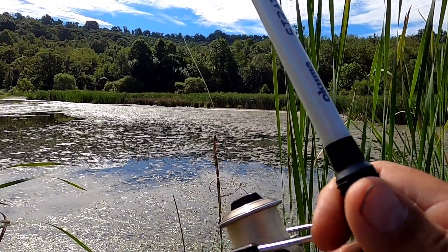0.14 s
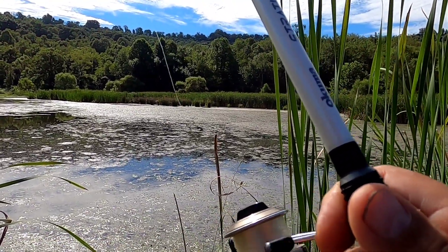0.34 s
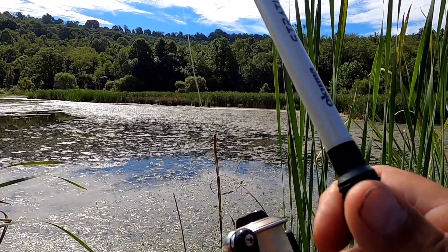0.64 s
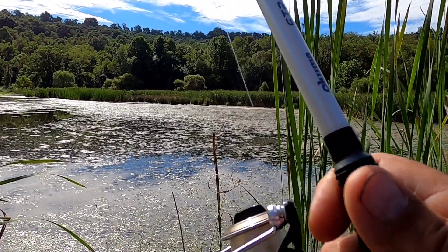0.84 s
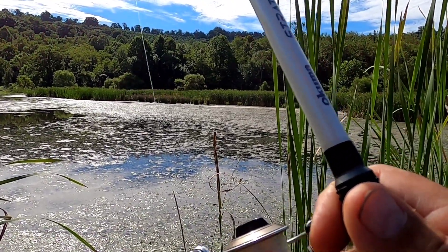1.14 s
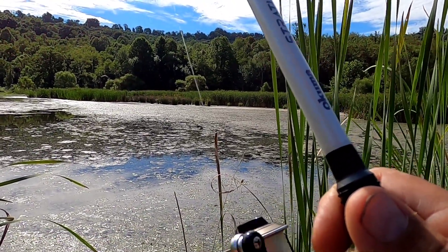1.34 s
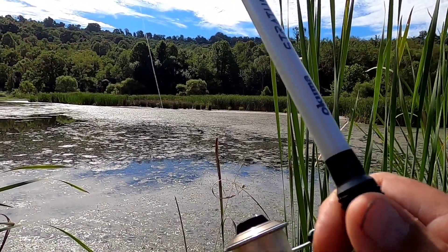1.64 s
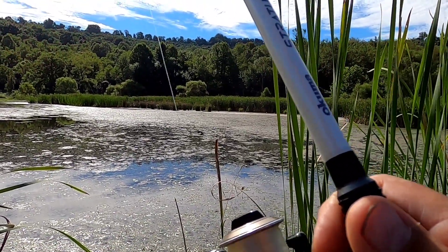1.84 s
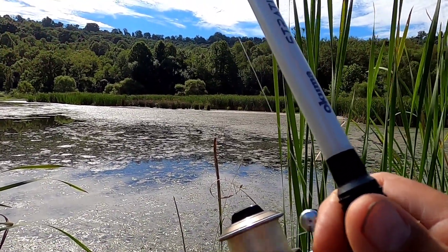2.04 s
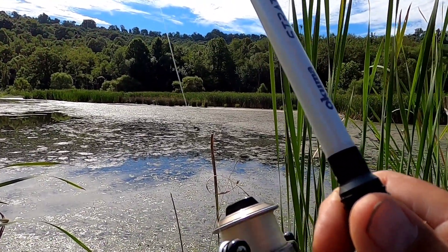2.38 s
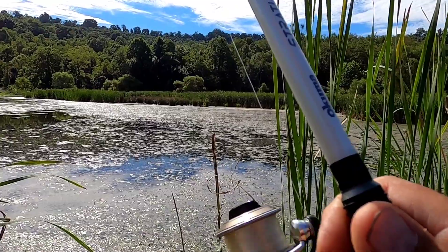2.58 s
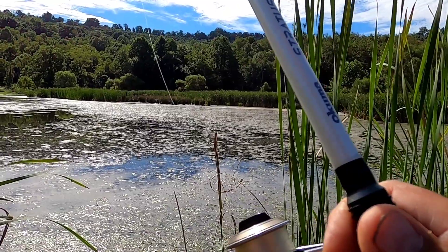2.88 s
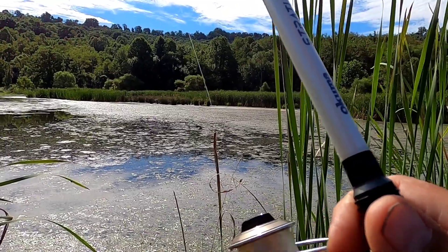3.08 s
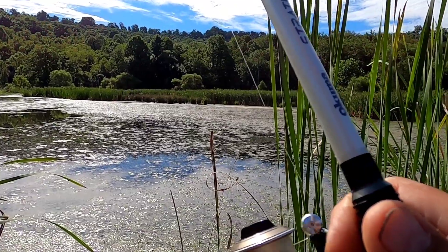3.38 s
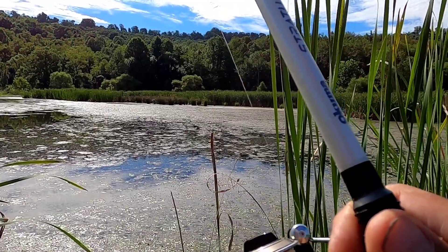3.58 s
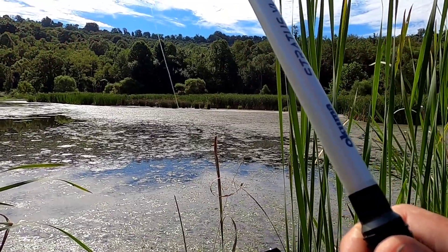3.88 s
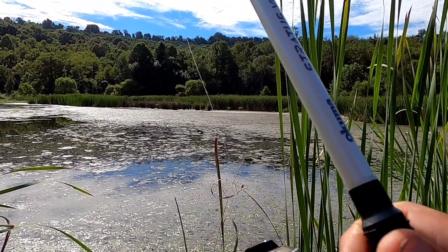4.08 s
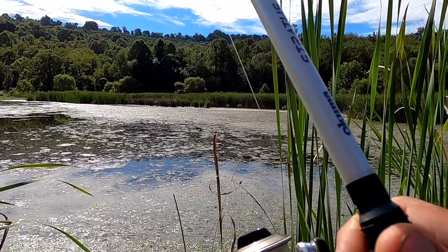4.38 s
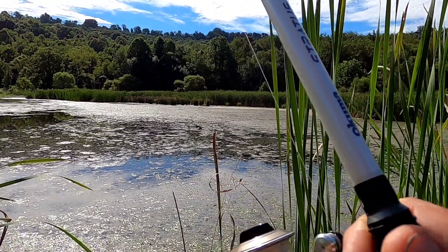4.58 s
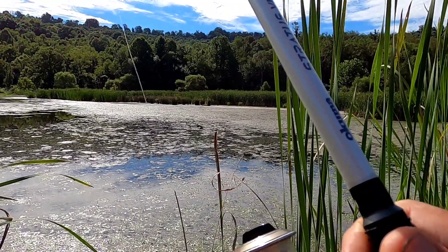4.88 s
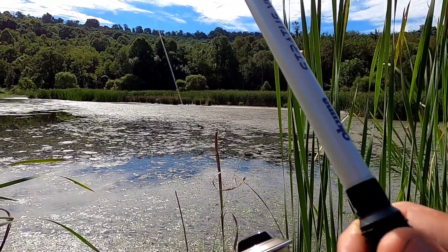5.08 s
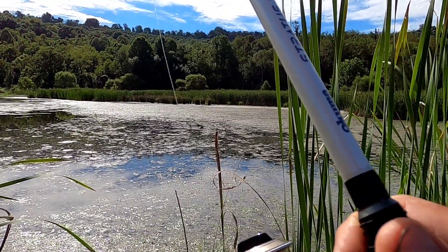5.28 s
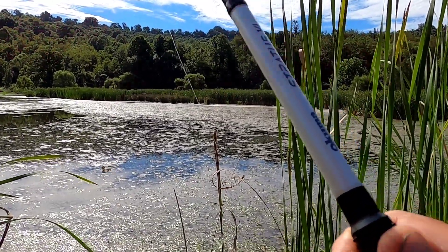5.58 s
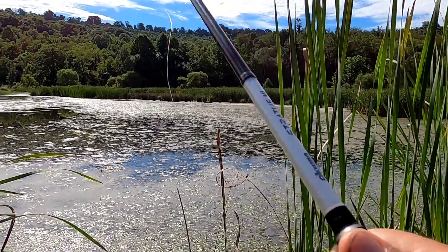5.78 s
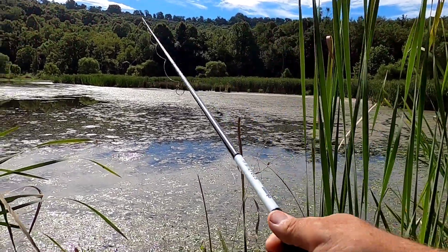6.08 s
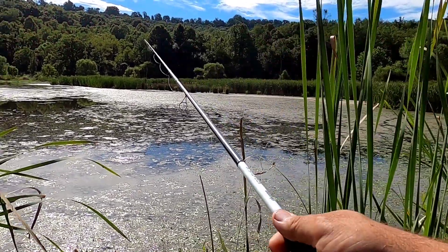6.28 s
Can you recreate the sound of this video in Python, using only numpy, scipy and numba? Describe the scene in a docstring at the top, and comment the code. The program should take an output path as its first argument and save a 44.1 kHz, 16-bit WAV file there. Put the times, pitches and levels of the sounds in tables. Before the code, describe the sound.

Close winding of a spinning reel, ringing and scraping with wet line hiss and small ticks, beside a pond of trilling insects and low rumble.

```python
"""An angler winds a spinning reel at a weedy pond, close to a microphone with two ports.
From the start the reel rasps in uneven strokes (slips ringing damped modes), and wet line hisses (coloured noise).
Crickets trill (gliding tone pulses) over an insect chorus; an engine drones under a breeze that gusts early on.
Ticks and brief squeaks dot the winding; near its end the grip creaks, loose parts rattle and the rod knocks.
Once the reel is still, a thin gliding tone swells briefly."""
import sys
import numpy as np
from scipy import signal
from scipy.fft import rfft, irfft, next_fast_len
from scipy.io import wavfile
from scipy.ndimage import uniform_filter1d
from numba import njit

SR = 44100
rng = np.random.default_rng(int(sys.argv[2]) if len(sys.argv) > 2 else 0)


def unload_wav(signal):
    """Save mono or channel-first audio to the path in sys.argv[1] as 16-bit WAV at rate SR, clipped to [-1, 1]."""
    wavfile.write(
        sys.argv[1],
        SR,
        np.round(np.clip(np.atleast_2d(signal).T, -1, 1) * 32767).astype(np.int16),
    )


N = 283563
T = np.arange(N) / SR
FREQS = np.fft.rfftfreq(N, 1 / SR)


def undb(db):
    """Logarithmic level: decibels to amplitude gain."""
    return 10 ** (np.asarray(db) / 20)


def unit(x):
    """Normalisation: scale to rms 1."""
    return x / np.sqrt(np.mean(x ** 2))


def across(points):
    """Spectral interpolation: a table over frequency, joined on a log axis."""
    hz, value = np.transpose(points)
    return np.interp(np.log(FREQS + 1), np.log(hz), value)


def pan(db):
    """Interaural level difference: left and right gains, left louder when positive."""
    return undb(np.array([[db], [-db]]) / 2)


def walk(rate_hz):
    """Low-passed randomness: a random wavering of rms 1, at up to about the given rate."""
    size = next_fast_len(N, real=True)
    hz = np.fft.rfftfreq(size, 1 / SR)
    spectrum = rfft(rng.standard_normal(size)) / (1 + (hz / rate_hz) ** 4)
    return unit(irfft(spectrum, size)[:N])


def swell(start, length, attack_s, release_s):
    """Smooth gating: attack, hold and release, from 0 to 1 and back."""
    rise = 1 + np.tanh(2 * (T - start) / attack_s)
    fall = 1 - np.tanh(2 * (T - start - length) / release_s)
    return (rise / 2) * (fall / 2)


def stereo_noise(gain, likeness, grain=1):
    """Partial coherence: mid and side noise, weighted to set the ports' correlation; grain shapes it first."""
    c = np.clip(across(likeness), -1, 1)
    source = rfft(rng.standard_normal((2, N)) * grain)
    mid, side = source * gain * np.sqrt([1 + c, 1 - c])
    return unit(irfft(np.array([mid + side, mid - side]), N))


def resonance(hz, width_hz):
    """Damped oscillator: frequency response of one mode."""
    return 1j * FREQS * width_hz / (hz ** 2 - FREQS ** 2 + 1j * FREQS * width_hz)


@njit
def svf(x, hz, width):
    """Time-varying resonance: a state-variable band-pass whose centre moves."""
    y, band, low = np.empty(len(x)), 0., 0.
    for i in range(len(x)):
        g, k = np.tan(np.pi * hz[i] / SR), width / hz[i]
        v = (band + g * (x[i] - low)) / (1 + g * (g + k))
        band, low, y[i] = 2 * v - band, low + 2 * g * v, k * v
    return y


# small frictional catches, each with a random strength
CATCHES_PER_S, CATCH_SPREAD_DB, CATCH_DECAY_S = 750, 3.5, .0009


def catches():
    """Stick-slip friction: an envelope of irregular catches, each starting sharply and decaying fast."""
    strength = undb(CATCH_SPREAD_DB * np.clip(rng.standard_normal(N), -2, 2))
    size = (rng.random(N) < CATCHES_PER_S / SR) * strength
    return unit(signal.lfilter([1], [1, -np.exp(-1 / (CATCH_DECAY_S * SR))], size))


CRACK_T60_S, CONTACT_RISE_S = .015, .00025


def contacts(hits, partials):
    """Modal impact: each hit (s, ring Hz, ring dB, t60 s, crack dB) cracks and rings a few damped modes."""
    t = T[:SR // 8]
    attack = 1 - np.exp(-t / CONTACT_RISE_S)
    lag = np.array([[2 / SR], [0]])  # sound reaches the left port a moment later
    rings, cracks = np.zeros((2, 2, N))
    for s, hz, ring_db, t60, crack_db in hits:
        at = slice(int(s * SR), int(s * SR) + len(t))
        modes = sum(undb(db) * np.sin(2 * np.pi * k * hz * (t - lag)) for k, db in partials)
        rings[:, at] += undb(ring_db - 60 * t / t60) * attack * modes
        shared, *own = rng.standard_normal((3, len(t)))
        noise = shared + 0.86 * np.array(own)
        cracks[:, at] += undb(crack_db - 60 * t / CRACK_T60_S) * attack * noise
    coloured = irfft(rfft(cracks) * resonance(2630, 4300) ** 2, N)
    return rings + coloured * pan(-1.8)


# relative spectrum of the wind rumble: frequency_hz, level_db
WIND_COLOUR = [(10, -40), (22, 1), (32, 8.5), (42, 14), (54, 3.5), (80, 0.5), (120, -4.5), (170, -14),
               (260, -29), (500, -67)]
# relative spectrum of open air over the pond: frequency_hz, level_db
AIR_COLOUR = [(30, 2), (120, 2.5), (210, 5), (280, -4.5), (400, -5), (700, -10.5), (1200, -12.5),
              (1800, -19), (2800, -23.5), (5000, -21.5), (15000, -67)]
# likeness of the two ports for sound from all around: frequency_hz, correlation (-1 to 1)
AROUND = [(30, 0.97), (120, 0.98), (300, 0.76), (700, 0.78), (1400, 0.29), (2400, -0.19), (4000, 0.25),
          (5100, -0.26), (5900, -0.038), (6900, -0.57), (8500, -0.2), (11000, -0.3)]
# a steady breeze and one gust, buffeted at random
BREEZE_DB, GUST_DB, GUST_PEAK_S, GUST_HALF_S = -47.5, 6, 1, 0.98
BUFFET_DB, BUFFET_RATE_HZ = 3, 12


def air(air_db=-56):
    """Turbulence noise: a low rumble swells and buffets with the gust, over the soft wash of the valley."""
    gust = np.exp(-((T - GUST_PEAK_S) / GUST_HALF_S) ** 2)
    wind_db = BREEZE_DB + gust * (GUST_DB + BUFFET_DB * walk(BUFFET_RATE_HZ))
    wind = stereo_noise(undb(across(WIND_COLOUR)), AROUND) * undb(wind_db)
    wash = stereo_noise(undb(across(AIR_COLOUR)), AROUND) * undb(air_db + 0.51 * walk(11.0))
    return wind + wash


# partials of the engine: frequency_ratio (multiple of the firing note), level_db (relative)
ENGINE_PARTIALS = [(1, -1), (1.5, -16.5), (6, -22.5), (7.33, -29.5)]
ENGINE_HZ, ENGINE_START_DB, ENGINE_FADE_DB_PER_S = 29.2, -37.5, 0.48


def engine(drift=0.00823):
    """Additive synthesis: the firing note and a few partials carry this far, wavering in the moving air."""
    phase = 2 * np.pi * np.cumsum(ENGINE_HZ * (1 + drift * walk(0.84))) / SR
    note = 0
    for ratio, db in ENGINE_PARTIALS:
        level = undb(db + min(ratio, 2) * 0.98 * walk(2.0))
        note = note + level * np.sin(ratio * phase + 0.12 * ratio * walk(5.8))
    return np.sqrt(2) * note * undb(ENGINE_START_DB - ENGINE_FADE_DB_PER_S * T)


# a thin far-off tone: pitch_hz (at its peak), glide_hz_per_s, level_db (peak of the swell)
THIN_TONE = [(1230, -300, -68), (1840, 1100, -75)]
THIN_TONE_PEAK_S, THIN_TONE_HALF_S = 6.4, 0.028


def thin_tone():
    """Linear frequency glide: two faint partials swell briefly once the reel is still."""
    t = T - THIN_TONE_PEAK_S
    partials = sum(undb(db) * np.sin(2 * np.pi * (hz + glide * t / 2) * t) for hz, glide, db in THIN_TONE)
    return np.sqrt(2) * partials * np.exp(-(t / THIN_TONE_HALF_S) ** 2)


def cricket(hz, pulse_hz, port_phase, haze_width_hz=90, sweep_hz=50):
    """Stridulation: every wing stroke sounds a tone that sags in pitch; reeds scatter it into a narrow haze."""
    stroke = np.cumsum(pulse_hz * (1 + 0.0159 * walk(1.62))) / SR % 1
    pulse = np.sin(np.pi * stroke) ** 2 * undb(1.3 * walk(12))
    phase = 2 * np.pi * np.cumsum(hz + sweep_hz * (.5 - stroke) + 16 * walk(25.9)) / SR
    direct = unit(pulse * np.sin(phase + np.array([[0], [port_phase]])))
    haze = stereo_noise(resonance(hz, haze_width_hz) ** 2, AROUND)
    return unit(direct + .45 * haze)


# louder spells in the nearest cricket's trill: start_s, length_s
TRILLS = [(0.628, 0.35), (0.993, 0.21), (1.617, 0.89), (2.9, 0.69), (4.128, 0.48), (5.08, 1.25)]
# relative spectrum of the far insect chorus: frequency_hz, level_db
CHORUS = [(2500, -44), (3600, -31), (4500, -12), (4850, -2.5), (5300, 0.5), (5550, 0), (5850, 1.5),
          (6400, 2), (6900, -2), (7500, -5.5), (8300, -15), (9300, -23.5), (12000, -46), (15500, -59)]
TRILL_DB, TRILL_SWELL_DB, TRILL_ATTACK_S, TRILL_RELEASE_S = -62, 5.5, 0.016, 0.084


def insects(waver_db=0.15, second_db=-65.5, chorus_db=-53):
    """Superposition: two crickets stand out of a chorus too far off to tell apart."""
    effort = sum(swell(start, length, TRILL_ATTACK_S, TRILL_RELEASE_S) for start, length in TRILLS)
    near_db = TRILL_DB + TRILL_SWELL_DB * effort + waver_db * walk(7.5)
    near = cricket(5008, 36.7, 1.81) * undb(near_db)
    second = cricket(4900, 39, 1.3) * undb(second_db + 2 * walk(0.43))
    flutter = undb(0.81 * walk(60) + 0.06 * walk(5.3))
    chorus = stereo_noise(undb(across(CHORUS)), AROUND, flutter)
    return near + second + chorus * undb(chorus_db) * pan(0.084)


# the hand shifting on the grip: start_s, length_s, level_db
GRIP = [(.01, 0.098, -57), (5.618, 0.089, -45.5), (5.771, 0.22, -56)]
# relative spectrum of the creaking grip: frequency_hz, level_db
GRIP_COLOUR = [(150, -32), (340, -0.5), (520, 4.5), (750, -7), (1000, 1), (1400, 0.5), (2300, -2),
               (3200, -3.5), (4000, -13), (12000, -39)]
# likeness of the two ports for the close tackle: frequency_hz, correlation (-1 to 1)
CLOSE = [(800, 0.9), (1600, 0.27), (2800, 0.19), (4000, 0.53), (5500, 1), (12000, -0.19)]


def grip(attack_s=0.021, release_s=0.058):
    """Stick-slip friction: skin creaks over the handle in small catches."""
    pressure = sum(undb(db) * swell(start, length, attack_s, release_s) for start, length, db in GRIP)
    return stereo_noise(undb(across(GRIP_COLOUR)), CLOSE, catches()) * pressure


# dull knocks of the rod in the hand: start_s, ring_hz, ring_db (before partial weights), t60_s
KNOCKS = [(4.152, 910, -38, 0.0073), (5.6787, 978, -20.5, 0.036), (5.756, 614, -38, 0.044),
          (5.8131, 600, -30, 0.023), (5.83, 505, -39, 0.12), (5.851, 458, -36, 0.043),
          (5.8731, 1020, -17, 0.0063), (5.962, 350, -48.5, 0.15)]
# partials of a knock: frequency_ratio (multiple of the ring), level_db (relative)
KNOCK_PARTIALS = [(.275, -13), (.62, -36), (1, -1), (1.37, -18)]
KNOCK_CRACK_DB = -17  # relative to the ring, before the crack is coloured


def knocks():
    """Modal impact: the rod bumps in the hand as it is lowered."""
    hits = [(s, hz, db, t60, db + KNOCK_CRACK_DB) for s, hz, db, t60 in KNOCKS]
    return contacts(hits, KNOCK_PARTIALS)


# loose parts; ring levels before partial weights, crack levels before colouring
RATTLE_START_S, RATTLE_LENGTH_S, RATTLE_HZ, RATTLE_OCTAVES = 5.6, 0.37, 3000, 1.45
RATTLE_DB, RATTLE_SPREAD_DB, RATTLE_CRACK_DB = -48, 8, -48


def rattle(count=36):
    """Random impacts: handle and bail rattle in a run of small, uneven contacts as the rod is lowered."""
    hits = []
    for when, colour, size in rng.random((count, 3)):
        start = RATTLE_START_S + when * RATTLE_LENGTH_S
        hz = RATTLE_HZ * 2 ** (RATTLE_OCTAVES * (colour - .5))
        ring_db = RATTLE_DB + RATTLE_SPREAD_DB * (size - .5)
        hits.append((start, hz, ring_db, TICK_T60_S, RATTLE_CRACK_DB))
    return contacts(hits, TICK_PARTIALS)


# sharp ticks of the reel: start_s, ring_hz, ring_db (before partial weights), crack_db (before colouring)
TICKS = [(0.0219, 2680, -29, -32), (.758, 2900, -41.5, -41), (1.162, 4370, -37, -44),
         (2.389, 3970, -31.5, -50), (2.682, 2520, -36, -39), (3.778, 5000, -35, -38.5),
         (4.244, 2800, -41, -44), (4.752, 3750, -27.5, -52), (4.992, 2500, -48, -29),
         (5.543, 3200, -35, -40), (5.658, 5140, -27, -32), (5.6635, 2300, -26.5, -34),
         (5.665, 6940, -25, -29), (5.6793, 4240, -26, -41), (5.8291, 6000, -31, -29.5),
         (5.9195, 4940, -33, -42), (5.943, 4140, -29, -33), (5.948, 2420, -40, -32),
         (5.956, 2450, -29.5, -39), (6.077, 4140, -45, -47), (6.168, 4200, -42.5, -50)]
# partials of a tick or rattle: frequency_ratio (multiple of the ring), level_db (relative)
TICK_PARTIALS = [(.62, -19), (0.998, 3), (1.37, -3)]
TICK_T60_S = 0.0063
FAINT_TICK_HZ, FAINT_TICK_DB, FAINT_CRACK_DB = 3600, -50, -54


def ticks(count=14):
    """Modal impact: the reel's clear ticks, and faint ones scattered through the winding."""
    clear = [(s, hz, ring_db, TICK_T60_S, crack_db) for s, hz, ring_db, crack_db in TICKS]
    faint = []
    for when, colour in rng.random((count, 2)):
        hz = FAINT_TICK_HZ * 2 ** (colour - .5)
        faint.append((when * WINDING_ENDS_S, hz, FAINT_TICK_DB, TICK_T60_S, FAINT_CRACK_DB))
    return contacts(clear + faint, TICK_PARTIALS)


# pace of the winding, as the line's level: time_s, level_db (before the line's gain)
WINDING = [(0.0, -74), (0.21, -89), (0.43, -90), (0.81, -84.5), (1.27, -79), (1.68, -76), (1.9, -79.5),
           (2.08, -85), (2.63, -87.5), (3.24, -75.5), (3.62, -77.5), (3.9, -81), (4.26, -81), (4.69, -82),
           (5.66, -75), (5.82, -72), (6.12, -85.5), (6.43, -99)]
WINDING_ENDS_S, RUN_DOWN_S = 6.06, .1


def winding_db():
    """Piecewise-linear envelope: pace of the winding, sample by sample."""
    return np.interp(T, *np.transpose(WINDING))


# the line scratches over the lip of the spool: start_s, length_s, level_db
SCRATCHES = [(.555, .04, -66), (2.51, 0.027, -76), (2.673, 0.066, -71)]
# relative spectrum of the running line: frequency_hz, level_db
LINE_COLOUR = [(1500, -12), (3000, 13), (5000, 9), (8000, 2.5), (10000, 5.5), (12800, 7), (14200, 0),
               (15600, -12)]


def line(gain_db=9.5):
    """Friction noise: wet line hisses to the right, louder the faster it is wound, and scratches at times."""
    scratch = sum(undb(db) * swell(start, length, STROKE_ATTACK_S, STROKE_RELEASE_S)
                  for start, length, db in SCRATCHES)
    level = undb(winding_db() + gain_db) + scratch * catches()
    hiss = stereo_noise(undb(across(LINE_COLOUR)), CLOSE, undb(0.82 * walk(500)))
    return hiss * level * pan(-4.5)


# rubbing locks for a moment into one clean ring: time_s (peak), pitch_hz (mean), level_db (peak of swell)
SQUEAKS = [(.527, 1704, -51), (.55, 1670, -46), (.595, 1627, -46.5), (.641, 1630, -45),
           (0.687, 1596, -48.5), (1.481, 1720, -43.5), (1.632, 1501, -49), (1.816, 1686, -42.5),
           (3.999, 1620, -49.5), (4.16, 1553, -42), (5.195, 1815, -55), (6.067, 1840, -52)]
SQUEAK_HALF_S = 0.0064


def squeaks(waver_hz=25):
    """Mode locking: one mode of the reel's body sings for a hundredth of a second or two."""
    waver = np.cumsum(waver_hz * walk(88.3)) / SR
    tone = 0
    for s, hz, db in SQUEAKS:
        envelope = undb(db) * np.exp(-((T - s) / SQUEAK_HALF_S) ** 2)
        tone = tone + envelope * np.sin(2 * np.pi * (hz * T + waver))
    tone = np.sqrt(2) * tone
    return np.array([np.roll(tone, 2), tone])


# the ring rises for a moment once in each slow cycle of the gears
RING_HZ, RING_RISE_HZ = 1604, 246
GEAR_CYCLE_S, GEAR_PEAK_S, GEAR_HALF_S = 2.39, 0.081, 0.55


def ring_pitch():
    """Periodic modulation: the ring climbs and falls back once per gear cycle."""
    from_peak = (T - GEAR_PEAK_S + GEAR_CYCLE_S / 2) % GEAR_CYCLE_S - GEAR_CYCLE_S / 2
    return RING_HZ + RING_RISE_HZ * np.exp(-(from_peak / GEAR_HALF_S) ** 2)


# rubbing strokes of the reel: start_s, length_s, ring_db, scrape_db (both before the reel's gains)
STROKES = [(0, 0.049, -59, -58), (0.174, 0.069, -53, -57.5), (0.523, 0.12, -51, -55.5),
           (0.908, 0.063, -56, -57), (1.031, 0.17, -55, -60), (1.26, 0.071, -53.5, -60.5),
           (1.426, 0.11, -51.5, -60), (1.574, 0.097, -46.5, -57), (1.746, 0.11, -54.5, -62.5),
           (1.961, 0.12, -59.5, -60.5), (2.324, 0.094, -54, -55), (2.5, 0.066, -56, -57.5),
           (2.686, 0.069, -58.5, -57.5), (2.901, 0.075, -53.5, -55.5), (3.094, 0.062, -47.5, -55),
           (3.196, 0.13, -49.5, -56), (3.451, 0.031, -49, -58.5), (3.611, 0.091, -50.5, -57.5),
           (3.811, 0.065, -49.5, -59.5), (3.996, 0.011, -54, -64), (4.139, 0.083, -45, -53.5),
           (4.389, 0.019, -59, -63), (4.519, 0.1, -58, -56.5), (4.694, 0.078, -48.5, -53),
           (5.085, 0.12, -53, -57), (5.268, 0.1, -60, -61), (5.431, 0.12, -54, -61.5),
           (5.58, 0.11, -48, -53), (5.726, 0.092, -47.5, -63), (5.808, 0.18, -53.5, -56.5),
           (6, 0.059, -64, -66)]
# moments when the handle rests: start_s, length_s
RESTS = [(.77, 0.13), (4.03, 0.099), (4.885, .2)]
REST_DB = -9
STROKE_ATTACK_S, STROKE_RELEASE_S, STROKE_SAG_DB_PER_S = 0.021, 0.045, 27.5
# the spool rubs on between strokes: levels at the mean pace before gains; dB gained per dB of pace
SPOOL_RING_DB, SPOOL_SCRAPE_DB, SPOOL_FOLLOW = -69.5, -73.5, 0.12


def rubbing():
    """Energy summation: power of ring and scrape, as the spool follows the pace and strokes bite and sag."""
    pace_db = winding_db()
    turning = np.clip((WINDING_ENDS_S - T) / RUN_DOWN_S + 1, 1e-3, 1)
    resting = sum(swell(start, length, STROKE_RELEASE_S, STROKE_ATTACK_S) for start, length in RESTS)
    spool = turning * undb(SPOOL_FOLLOW * (pace_db - pace_db.mean()) + REST_DB * resting)
    ring = (spool * undb(SPOOL_RING_DB)) ** 2
    scrape = (spool * undb(SPOOL_SCRAPE_DB)) ** 2
    for start, length, ring_db, scrape_db in STROKES:
        sag = undb(-STROKE_SAG_DB_PER_S * np.maximum(T - start, 0))
        power = swell(start, length, STROKE_ATTACK_S, STROKE_RELEASE_S) * sag ** 2
        ring = ring + power * undb(ring_db) ** 2
        scrape = scrape + power * undb(scrape_db) ** 2
    return ring, scrape


# close modes of the reel's body, which beat together: frequency_hz, width_hz, level_db (relative)
BODY_MODES = [(1414, 130, -6.5), (1555, 56, 4), (1669, 54, 3), (1773, 39, 1.5), (1870, 48, 3.5),
              (2041, 105, -1.5)]
# resonances colouring the scrape: frequency_hz, width_hz (of one of two passes), level_db (per hertz of width)
SCRAPE_MODES = [(676, 1700, -8.5), (2030, 970, -3), (2385, 310, -2), (2980, 870, -3.5), (3676, 240, 0.5),
                (4050, 226, 2.5), (4380, 420, -3), (7900, 2700, -16)]
# tiny slips within a stroke, with a hiss between them
SLIPS_PER_S, SLIP_SPREAD_DB, SLIP_HISS = 450, 3.5, .5


def reel(skirt_hz=230.0, chatter_db=1.0, wander_hz=40, patchy_db=2.0, ring_db=0, scrape_db=3.0, uneven_db=2.15):
    """Source-filter principle: swells of tiny slips ring the reel's body and scrape over its higher modes."""
    ring_power, scrape_power = rubbing()
    pitch = ring_pitch() + wander_hz * walk(51)
    chatter = undb(chatter_db * walk(36))
    slips = (rng.random(N) < SLIPS_PER_S / SR) * undb(SLIP_SPREAD_DB * rng.standard_normal(N))
    force = (unit(slips) + SLIP_HISS * rng.standard_normal(N)) * chatter
    # neighbouring modes have opposite sign
    modes = sum((-1) ** k * undb(db) * resonance(hz, width) for k, (hz, width, db) in enumerate(BODY_MODES))
    body = svf(irfft(rfft(force) * modes, N), pitch, float(skirt_hz))
    # short-time levelling: divide the ringing by its local rms, so the stroke envelope sets the loudness
    levelled = body / np.sqrt(uniform_filter1d(body ** 2, size=600))
    body = levelled * np.sqrt(ring_power) * undb(uneven_db * walk(33))
    # as the contact moves round, it favours now one mode, now another
    grit = np.sqrt(chatter * catches())
    scrape = 0
    for hz, width, db in SCRAPE_MODES:
        mode = stereo_noise(resonance(hz, width) ** 2, CLOSE, grit * np.sqrt(catches()))
        scrape = scrape + mode * np.sqrt(width) * undb(db + patchy_db * walk(13.0))
    scrape = unit(scrape) * np.sqrt(scrape_power)
    # the reel is nearer the right port
    ports = np.array([np.roll(body, 2), body])
    return undb(ring_db) * ports * pan(-.3) + undb(scrape_db) * scrape * pan(-1.5)


def scene():
    """Superposition: the pond behind, the tackle close by."""
    pond = air() + engine() + thin_tone() + insects()
    tackle = grip() + knocks() + rattle() + ticks() + line() + squeaks() + reel()
    return pond + tackle


def record(dry):
    """Band limitation: a steep elliptic low-pass at 15.1 kHz cuts the top."""
    return signal.sosfilt(signal.ellip(8, .2, 70, 15100, fs=SR, output="sos"), dry)


dry = scene()
out = record(dry)
unload_wav(out)
```